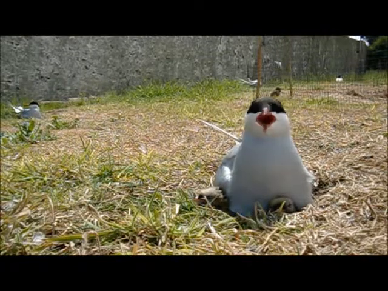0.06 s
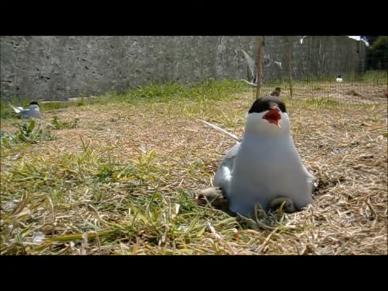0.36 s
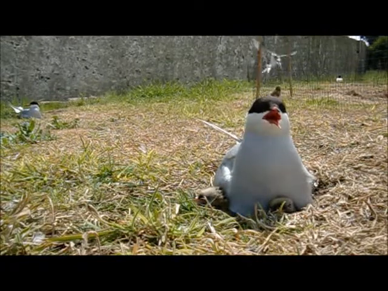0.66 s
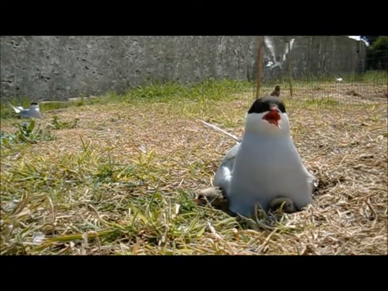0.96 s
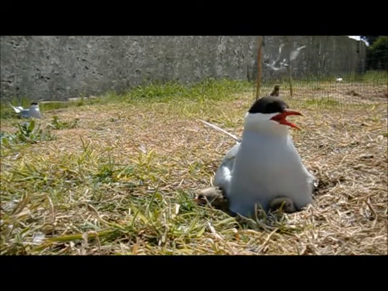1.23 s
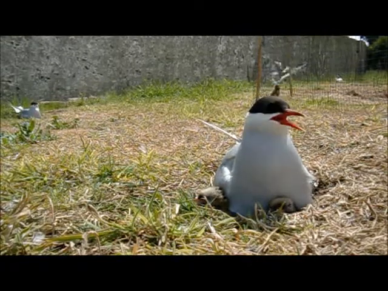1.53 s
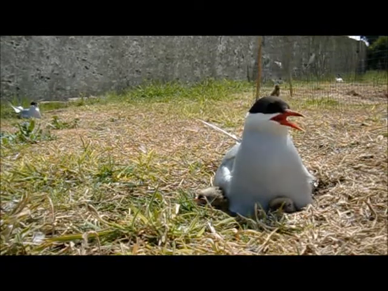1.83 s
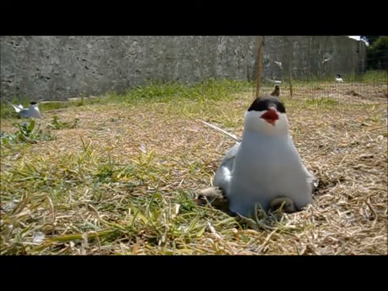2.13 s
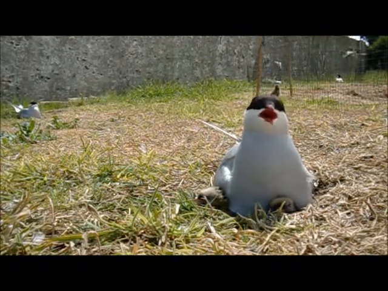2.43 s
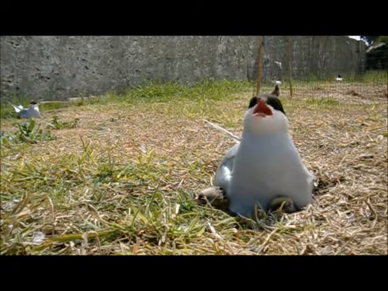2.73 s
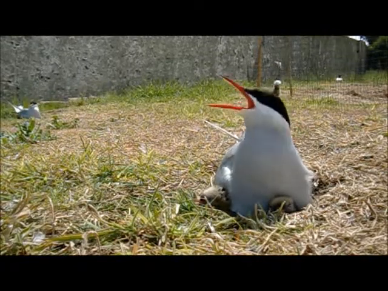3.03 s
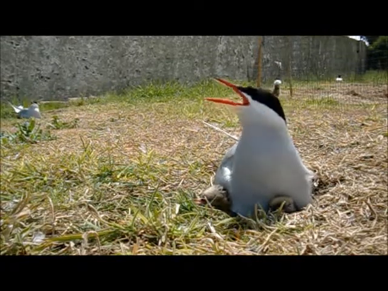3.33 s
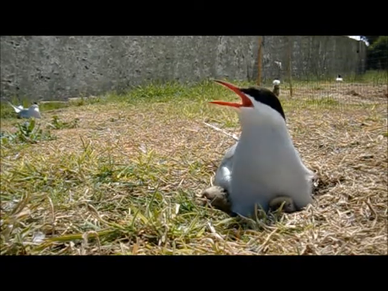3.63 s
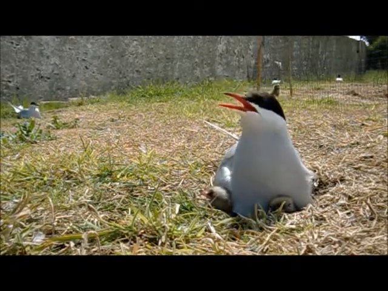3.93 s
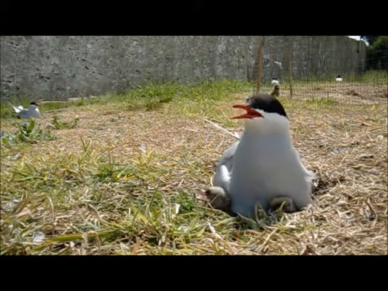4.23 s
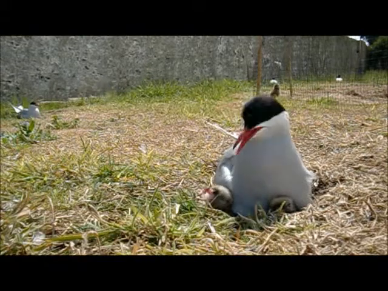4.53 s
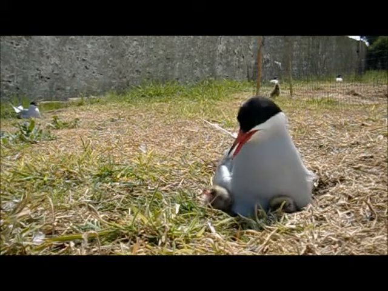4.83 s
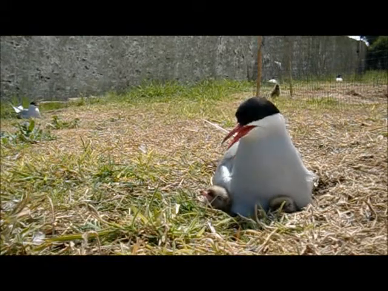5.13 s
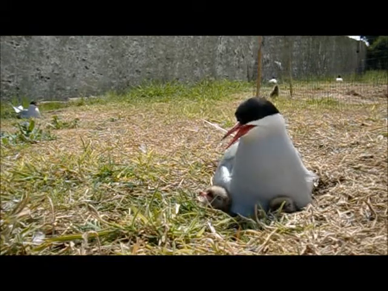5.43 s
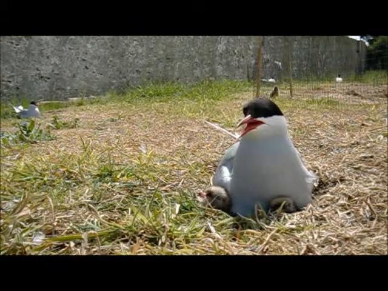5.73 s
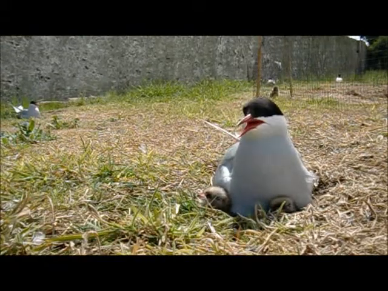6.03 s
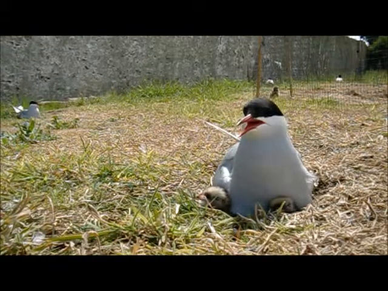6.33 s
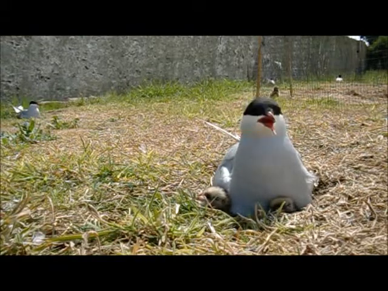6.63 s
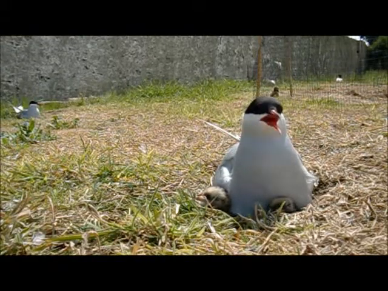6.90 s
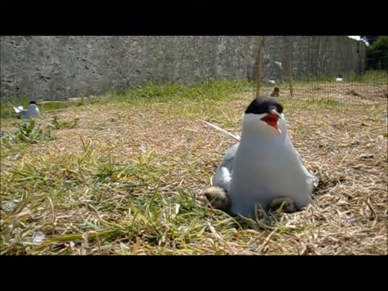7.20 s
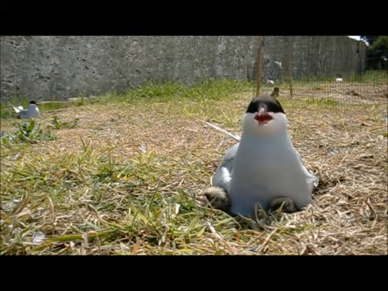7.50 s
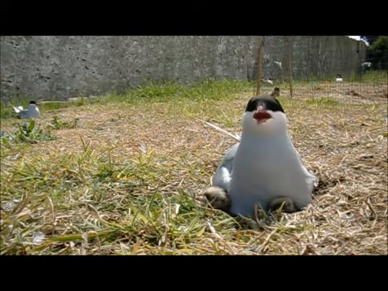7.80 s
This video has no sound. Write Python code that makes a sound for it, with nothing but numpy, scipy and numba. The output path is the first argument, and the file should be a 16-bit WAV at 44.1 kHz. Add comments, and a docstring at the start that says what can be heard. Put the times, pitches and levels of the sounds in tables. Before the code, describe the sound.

A dense, shrill chorus of distant terns runs for the whole eight seconds, outdoors, with a faint low rumble beneath. At about 0.1 seconds a tern very close to the microphone gives one sharp, high kip that ends in a tiny creak. Quieter neighbours answer throughout with trilled, mostly falling cries, short kips and creaks, with a light echo. At 2.5 and 2.7 seconds the close bird gives two loud kips. From 2.9 to 3.6 seconds it rattles out about nine hard, dry ticks, with stuttered whistled notes near 3.4 and 3.7 seconds. The background ducks under each close call and swells back. The close bird adds one tiny clipped kip near 4.9 seconds. The neighbours and colony then carry on to the end, with short harsh rattles around 6.1, 6.7 and 7.6 seconds.

```python
"""A sharp "kip" from a tern on its nest, very close, cuts through the wash of a whole colony.
More kips follow, then a rattle of dry ticks and two stuttered notes. Neighbours answer with kips,
creaks and trilled, mostly falling cries. A membrane in each bird's voice box whistles for the clear
notes; for ticks and creaks it slaps, and each slap rings the throat and bill.
An automatic gain control turns everything down at each close call and lets the colony swell back."""
import sys
import numpy as np
from scipy import signal
from scipy.fft import rfft, irfft, next_fast_len
from scipy.io import wavfile
from scipy.ndimage import uniform_filter1d, map_coordinates
from numba import njit

SR = 44100
rng = np.random.default_rng(int(sys.argv[2]) if len(sys.argv) > 2 else 0)


def digitize_waveform(pressure):
    """Quantize a signal to 16-bit integers and store it at the path in sys.argv[1].

    Rows of a 2-D input are taken as channels; values are limited to [-1, 1].
    """
    field = np.atleast_2d(pressure).T
    bounded = np.clip(field, -1, 1)
    quanta = np.round(bounded * 32767).astype(np.int16)
    wavfile.write(sys.argv[1], SR, quanta)


N = 351036

# All levels in the tables are relative.
# the close tern's kips: (time [s], whistle length [s], pitch [Hz], level [dB], air burst [dB])
TERN_KIPS = [(0.1198, 0.036, 3384, 3, -12), (2.5303, .034, 3360, 7, -5.5), (2.7306, .037, 3420, 6.5, -14),
             (4.9486, 0.0023, 2860, 0.5, -28)]
# its dry ticks, longer as the rattle goes on: (time [s], length [s], level [dB])
TERN_TICKS = [(2.931, 0.006, 10), (2.993, 0.0071, 12), (3.059, 0.0083, 12), (3.122, 0.0092, 9),
              (3.193, 0.0085, 10.5), (3.2688, 0.013, 9.5), (3.338, .015, 6), (3.569, 0.016, 6.5),
              (3.638, 0.02, 5)]
# its stuttered notes: (click time [s], whistle time [s], click level [dB], whistle level [dB])
TERN_STUTTERS = [(3.413, 3.4355, 0.5, 2.5), (3.71, 3.76, 5.5, 4.5)]
# neighbours' trilled cries: (time [s], length [s], first pitch [Hz], last pitch [Hz], level [dB],
# octave level [dB], upper overtones [dB])
NEIGHBOUR_CRIES = [(.177, 0.097, 3160, 2930, -26, -37, -49), (0.264, .17, 3350, 3470, -25.5, -37, -43.5),
                   (0.697, 0.076, 3044, 2893, -21, -33, -47), (0.783, 0.085, 3290, 3360, -22.5, -31, -39.5),
                   (0.934, 0.3, 2950, 2880, -33.5, -40, -49.5), (0.844, 0.23, 3020, 2685, -42, -55, -51),
                   (1.316, 0.14, 3400, 3610, -30.5, -38.5, -57), (1.517, .37, 3650, 3400, -30, -50, -49),
                   (1.619, 0.41, 3190, 2966, -37, -43, -50), (2.102, 0.3, 3360, 3120, -29.5, -31.5, -47),
                   (2.334, 0.21, 3780, 3520, -28.5, -31.5, -45.5), (2.626, 0.17, 3210, 3400, -27, -29, -37),
                   (2.885, 0.14, 3015, 3180, -29, -34, -41.5), (3.032, 0.2, 3730, 3536, -26, -32.5, -46),
                   (3.482, .21, 3370, 3270, -35, -36.5, -45), (3.794, 0.12, 3200, 2890, -28.5, -38, -46),
                   (4.069, 0.095, 3140, 3060, -33, -34.5, -42.5),
                   (4.159, .29, 3665, 3285, -32, -40.5, -48.5), (4.312, .17, 3150, 3000, -32, -38, -45.5),
                   (4.62, .2, 3364, 3040, -28.5, -33, -42), (4.857, 0.16, 3480, 2900, -31, -44, -53),
                   (5.748, .12, 3210, 3090, -29.5, -36.5, -52), (5.925, 0.23, 3650, 3020, -26.5, -31, -37),
                   (6.22, .17, 2180, 2420, -28, -42, -56), (6.59, .16, 3665, 2980, -28, -28.5, -50),
                   (7.134, .23, 3594, 3065, -30, -41, -43), (7.376, 0.27, 3287, 2947, -27.5, -37.5, -47.5),
                   (7.718, 0.149, 2103, 2240, -36, -51, -47)]
# their kips: (time [s], pitch [Hz], level [dB], octave level [dB])
NEIGHBOUR_KIPS = [(0.038, 2780, -32.5, -40), (1.46, 3436, -32, -38), (1.585, 3574, -32.5, -34),
                  (1.726, 3706, -32, -33.5), (1.862, 3590, -35, -38.5), (4.058, 3506, -38, -36),
                  (4.937, 3510, -40, -38.5), (5.028, 3554, -35.5, -32.5), (5.201, 3590, -38.5, -40.5),
                  (5.24, 2170, -47, -38.5), (5.361, 3400, -34.5, -30.5), (5.829, 3126, -32, -35),
                  (6.172, 3620, -36, -44), (6.345, 2510, -51, -41), (6.415, 3410, -40, -41.5),
                  (7.827, 2540, -51, -37.5)]
# their creaks: (time [s], length [s], starting level [dB], throat ring [Hz])
NEIGHBOUR_CREAKS = [(0.055, 0.02, -14, 4100), (0.457, 0.023, -14.5, 3780), (0.555, 0.016, -13, 3550),
                    (1.001, 0.019, -15, 4000), (1.091, 0.023, -17.5, 3980), (1.193, 0.016, -16.5, 3950),
                    (1.453, 0.037, -18, 3600), (2.271, 0.034, -25, 4400), (2.358, 0.011, -15, 4860),
                    (2.453, 0.02, -16.5, 4400), (4.921, 0.015, -9, 3330)]
# their harsh rattles: (time [s], length [s], first slap rate [Hz], starting level [dB], throat ring [Hz])
NEIGHBOUR_RATTLES = [(.647, 0.028, 198.4, -10, 3970), (4.149, 0.11, 99.8, -18.5, 3800),
                     (6.111, .3, 104.7, -20, 5100), (6.657, 0.21, 127.7, -16.5, 3300),
                     (7.572, .29, 100.2, -14.5, 4060)]
# how loud the colony is, one list before the close tern's outburst and one after:
# (time [s], shrill birds [dB], low-voiced birds [dB])
COLONY_LEVELS = [
    [(0.4, -37, -39.5), (0.474, -31.5, -42), (0.542, -33.5, -39), (0.796, -32.5, -54), (1.04, -37.5, -42),
     (1.33, -34, -41), (1.7, -35, -44.5), (2.082, -35.5, -43), (2.3, -31.5, -47)],
    [(4.15, -38.5, -72), (4.38, -38, -45), (4.72, -36, -42), (4.99, -34, -37.5), (5.26, -40.5, -49.5),
     (5.76, -40, -38.5), (6.19, -34.5, -37.5), (7.01, -38, -40.5), (7.96, -31.5, -37.5)],
]
# the tone of far voices blurred together: (frequency [Hz], level [dB])
WASH_TONE = [(300, -25.5), (700, -22), (1200, -19), (1900, -10), (2600, -4.5), (3150, -11.5), (3900, -5),
             (5200, -2.5), (6600, -14), (9500, -25.5), (13000, -58), (16000, -26)]
# the tone of the low outdoor rumble: (frequency [Hz], level [dB])
RUMBLE_TONE = [(20, 1), (50, 0), (110, -2), (250, -7), (500, -10.5), (1000, -17.5), (3000, -25)]
# the echo off the wall and ground: (frequency [Hz], time to fade by 60 dB [s])
ECHO_FADE = [(500, 0.29), (3000, 0.45), (12000, 0.35)]
# the microphone's tone, with two narrow dips in the treble: (frequency [Hz], gain [dB])
MIC_TONE = [(20, -6), (6900, 2.5), (7350, 1), (7750, -4), (8300, 4), (9200, 5), (10400, 4), (11600, -1),
            (12800, 4), (15800, -0.5)]


def sitting_tern():
    """The close bird: whistled kips that break into a creak, dry ticks and stuttered notes."""
    out = np.zeros(N)
    for s, length, hz, db, air_db in TERN_KIPS:
        whistle = close_whistle(length, hz, db, fall=.261, octave_db=-7, release=.94,
                                kick_db=3, air_db=air_db)
        add(out, s, whistle)
        add(out, s + length, close_creak(.021, first_hz=665, last_hz=383, db=db + 4.5, throat_hz=4150))
    for s, length, db in TERN_TICKS:
        stretch = length / .0065  # a longer tick slaps faster and rings deeper
        slap_hz = 472 * stretch ** .6
        add(out, s, close_creak(length, slap_hz, .53 * slap_hz, db, throat_hz=4590 / stretch ** .17))
    return out + sum(stutter(*row) for row in TERN_STUTTERS)


def stutter(click_s, held_s, click_db, db):
    """The voice catches: a click, pips that grow longer and louder, then a held whistle that fades."""
    gap_s, held_length = .011, .042
    out = np.zeros(N)
    add(out, click_s, close_creak(.0033, first_hz=1100, last_hz=860, db=click_db, throat_hz=3900))
    pip_times = np.arange(held_s - gap_s, click_s + gap_s / 3, -gap_s)  # last pip first
    for k, s in enumerate(pip_times):
        pip = close_whistle(.0068 * .7 ** k, hz=3215, db=db - 6 * k,
                            fall=.013, octave_db=-11.5, release=.66)
        add(out, s, pip)
    held = close_whistle(held_length, hz=3228, db=db, fall=.14, octave_db=-11.5, release=.78)
    _, progress = clock(held_length)
    add(out, held_s, held * (1 - progress ** 6))
    return out


def close_whistle(length, hz, db, fall, octave_db, release, kick_db=0, air_db=-120):
    """A clean note with a trace of hiss; it may start with a rough kick and air from the bill."""
    levels = db, db + octave_db, db - 28
    note = kip(length, hz, levels, rough=.0034, attack_s=.0018, release=release, fall=fall, scoop=.0086)
    kick = kick_db * np.exp(-np.arange(len(note)) / SR / .0011)
    breath = uniform_filter1d(uniform_filter1d(rng.standard_normal(len(note)), size=70), size=40)
    hiss = (.091 + .11 * kick) * rng.standard_normal(len(note))
    return amp(air_db) * kick * breath + note * amp(kick) * (1 + hiss)


def close_creak(length, first_hz, last_hz, db, throat_hz):
    """Dry slaps that start hard and fade."""
    return creak(length, first_hz, last_hz, db, throat_hz, swell_db=-12, jitter=.035, snap=.19)


def kip(length, hz, levels, rough, attack_s, release, fall, scoop):
    """A short arched note that holds its pitch, then drops as the air pressure runs out."""
    t, progress = clock(length)
    # scoop, fall and rough are shares of the pitch; release is a share of the length
    arch = 1 - scoop * (1 - progress) ** 4 - fall * progress ** 3.58
    pitch = hz * (arch + rough * wobble(880, len(t)))
    shape = np.clip(t / attack_s, 0, 1) * np.clip((1 - progress) / release, 0, 1) ** .39
    return shape * voice_box(pitch, *levels)


def creak(length, first_hz, last_hz, db, throat_hz, swell_db, jitter, snap):
    """Uneven membrane slaps, sliding from one rate to another, ring the windpipe, throat and bill."""
    t, progress = clock(length)
    rate = (first_hz + (last_hz - first_hz) * progress) * (1 + jitter * wobble(500, len(t)))
    slaps = np.diff(np.floor(np.cumsum(rate) / SR), prepend=-1)  # one spike each cycle
    slaps *= amp(db + swell_db * progress + rng.standard_normal(len(t)))
    age, _ = clock(.012)
    # ringing tones: (frequency [Hz], width [Hz], level [dB])
    tones = [(720, 450, -25), (2150, 450, -14), (2900, 500, -7), (throat_hz, 520, -3), (6500, 900, -16)]
    ring = sum(amp(level) * np.exp(-np.pi * width * age) * np.sin(2 * np.pi * hz * age) * (-1) ** k
               for k, (hz, width, level) in enumerate(tones))
    ring[:2] += snap * np.array([1, -1])  # a bright edge on each slap
    ring += .12 * np.exp(-age / .00014)  # and a small puff of air
    return np.convolve(slaps, ring)


def voice_box(hz, db, octave_db, upper_db):
    """A whistling membrane: one pitch and four overtones."""
    phase = 2 * np.pi * np.cumsum(hz) / SR
    levels = db, octave_db, upper_db, upper_db - 2, upper_db - 14
    return np.sqrt(2) * sum(amp(level) * np.sin(k * phase) * (k * hz < SR / 2)
                            for k, level in enumerate(levels, start=1))


def neighbours():
    """Birds a few nests away and overhead cry, kip, creak and rattle, with a light echo."""
    out = np.zeros(N)
    for s, length, first_hz, last_hz, *levels in NEIGHBOUR_CRIES:
        trill_hz = 53.77 * (first_hz / last_hz) ** 1.575  # faster the further the cry falls
        add(out, s, cry(length, first_hz, last_hz, trill_hz, levels, rough=.0029, hoarse=3.2))
    kip_length = .038
    for s, hz, db, octave_db in NEIGHBOUR_KIPS:
        levels = db, octave_db, octave_db - 15.5
        note = kip(kip_length, hz, levels, rough=.012, attack_s=.002, release=.55, fall=.253, scoop=.01)
        add(out, s, amp(8.5) * note)
        # as the whistle fails, the membrane ends on a short creak
        ending = creak(.021, 750, 450, db + 16, throat_hz=3850, swell_db=-1, jitter=.077, snap=.23)
        add(out, s + .72 * kip_length, ending)
    for s, length, db, throat_hz in NEIGHBOUR_CREAKS:
        add(out, s, creak(length, 841, 559, db, throat_hz, swell_db=6.5, jitter=.046, snap=.16))
    for s, length, slap_hz, db, throat_hz in NEIGHBOUR_RATTLES:
        rattle = creak(length, slap_hz, .92 * slap_hz, db, throat_hz, swell_db=2, jitter=.04, snap=.25)
        add(out, s, rattle)
    return out + amp(-13) * echo(out)


def cry(length, first_hz, last_hz, trill_hz, levels, rough, hoarse=0):
    """A cry scoops up to its pitch, breaks into an uneven trill and ends hoarse."""
    t, progress = clock(length)
    beat = 2 * np.pi * np.cumsum(trill_hz * (1 + .063 * wobble(21.5, len(t)))) / SR
    # the further a cry falls, the longer it whistles cleanly before the trill
    clean_s = np.clip(.5 * (first_hz - last_hz) / first_hz - .015, 0, .06)
    trill = np.clip((t - clean_s) / .015 + 1, 0, 1)
    glide = first_hz + (last_hz - first_hz) * progress ** .7
    scoop = 1 - .16 * np.exp(-t / (.002 + .25 * clean_s))
    waver = .007 * wobble(24, len(t))
    rasp = rough * (1 + hoarse * progress ** 2) * wobble(700, len(t))
    pitch = glide * scoop * (1 + .012 * trill * np.cos(beat) + waver + rasp)
    pulses = 1 - .44 * trill * (1 - np.tanh(3.5 * (np.sin(beat) + .25)))  # the level dips on each beat
    uneven = amp(1.6 * wobble(60, len(t)) + 2.5 * progress ** 2 * wobble(1600, len(t)))
    shape = np.clip(t / .014, 0, 1) * np.clip((1 - progress) / .1, 0, 1)
    return unit(pulses * shape * uneven) * voice_box(pitch, *levels)


def colony():
    """Distant callers merge into a wash; a faint rumble and hum lie beneath."""
    times, *columns = np.vstack(COLONY_LEVELS).T
    shrill_gain, low_gain = (amp(np.interp(np.arange(N) / SR, times, db)) for db in columns)
    wash = amp(-4) * rush(WASH_TONE)
    callers = amp(2) * flock(3172, spread=.09, octave_db=-8, upper_db=-17, cry_length=.11, count=130)
    low_voices = amp(2) * flock(2152, spread=.13, octave_db=-3, upper_db=-14, cry_length=.04, count=260)
    hum_hz = 151 + 1.27 * wobble(4.1, N)
    hum = amp(-58.5) * np.sin(2 * np.pi * np.cumsum(hum_hz) / SR)
    rumble = amp(-51) * rush(RUMBLE_TONE)
    return amp(4.5) * shrill_gain * (callers + wash) + low_gain * low_voices + rumble + hum


def flock(pitch_hz, spread, octave_db, upper_db, cry_length, count):
    """Many distant birds at random times, each with a cry, an arched kip and a rattle."""
    out = np.zeros(N + SR)
    times = (np.arange(count)[:, None] + rng.random((count, 3))) / count * (N / SR + .5)
    traits = rng.uniform(-1.7, 1.7, (count, 5))  # every bird has its own voice
    for (cry_s, kip_s, rattle_s), (high, loud, long, fast, slope) in zip(times, traits):
        hz, db = pitch_hz * np.exp(spread * high), 2.5 * loud
        levels = db, db + octave_db, db + upper_db
        length, trill_hz = cry_length * np.exp(.3 * long), 62 * np.exp(.2 * fast)
        add(out, cry_s, cry(length, hz * 1.03, hz * (.93 + .07 * slope), trill_hz, levels, rough=.012))
        note = kip(.045, hz * 1.07, levels, rough=.012, attack_s=.006, release=.3, fall=.2, scoop=.1)
        add(out, kip_s, amp(3) * note)
        slap_hz = 300 * np.exp(.6 * fast)
        rattle = creak(.05, slap_hz, 250, db + 14.5, hz * 1.2, swell_db=3.5, jitter=.15, snap=.15)
        add(out, rattle_s, rattle)
    out = out[SR // 2:][:N]  # begin with the birds already calling
    return unit(out + amp(-2) * echo(out))


def rush(tone, patchy_db=2):
    """Noise of the given tone, with drifting louder and softer patches."""
    _, _, bands = signal.stft(rng.standard_normal(N), nperseg=512)
    patches = uniform_filter1d(rng.standard_normal(bands.shape), size=4, axis=0)
    patches = uniform_filter1d(patches, size=8, axis=1)
    _, noise = signal.istft(bands * amp(patchy_db * unit(patches)), nperseg=512)
    return unit(coloured(noise[:N], tone))


def echo(x):
    """A short, blurred answer from the wall and ground."""
    hz, t, bands = signal.stft(rng.standard_normal(SR // 3), SR, nperseg=256)
    fade = amp(-60 * t / along(ECHO_FADE, hz)[:, None])
    _, tail = signal.istft(bands * fade, SR, nperseg=256)
    return signal.fftconvolve(x, tail / np.linalg.norm(tail))[:N]


def amp(db):
    """Turn decibels into a gain."""
    return 10 ** (np.asarray(db) / 20)


def unit(x):
    """Scale a signal to an average power of 1."""
    return x / np.sqrt(np.mean(x ** 2) + 1e-20)


def along(points, hz):
    """Read between (frequency [Hz], value) points, with octaves evenly spaced."""
    frequencies, values = np.transpose(points)
    return np.interp(np.log(hz + 1), np.log(frequencies + 1), values)


def wobble(rate, size):
    """A smooth curve through `rate` random points a second."""
    points = rng.standard_normal(int(size * rate / SR) + 4)
    return map_coordinates(points, [np.arange(size) * rate / SR])


def clock(length):
    """Seconds, and progress from 0 to 1, through one call."""
    t = np.arange(max(int(length * SR), 32)) / SR
    return t, t / t[-1]


def add(track, s, x):
    """Mix x into the track at s seconds."""
    start = max(round(s * SR), 0)
    part = track[start:start + len(x)]
    part += x[:len(part)]


def coloured(x, tone):
    """Filter x to a (frequency [Hz], gain [dB]) shape."""
    size = 2 * next_fast_len(N // 2 + 8192)
    log_gain = np.log(amp(along(tone, np.fft.rfftfreq(size, 1 / SR))))
    # fold the filter in time so it rings only after a sound, never before
    folded = irfft(log_gain)
    folded[1:size // 2] *= 2
    folded[size // 2 + 1:] = 0
    return irfft(rfft(x, size) * np.exp(rfft(folded)))[:N]


@njit
def held_peak(size, charge, leak):
    """Follow the peaks of a signal: rise fast, sink slowly."""
    out, held = np.empty(len(size)), 0.0
    for i in range(len(size)):
        held += max(size[i] - held, 0.0) * charge - held * leak
        out[i] = held
    return out


def scene():
    """Everything that reaches the microphone, in one channel."""
    return (sitting_tern() + neighbours() + colony())[None]


def record(dry, limit=.65, attack_s=.00018, release_s=.15, ceiling=.93, top_hz=16000):
    """The microphone colours the sound, gain control ducks loud calls, and the top treble is cut."""
    x = coloured(dry[0], MIC_TONE)
    peak = held_peak(np.abs(x), 1 / (attack_s * SR), 1 / (release_s * SR))
    x = x / np.maximum(peak / limit, 1)
    x = x / (1 + (x / ceiling) ** 8) ** (1 / 8)  # round off peaks that outrun the gain control
    size = next_fast_len(N + 8192)
    treble_cut = 1 + (np.fft.rfftfreq(size, 1 / SR) / top_hz) ** 160
    return irfft(rfft(x, size) / treble_cut, size)[None, :N]


dry = scene()
out = record(dry)
digitize_waveform(out)
```